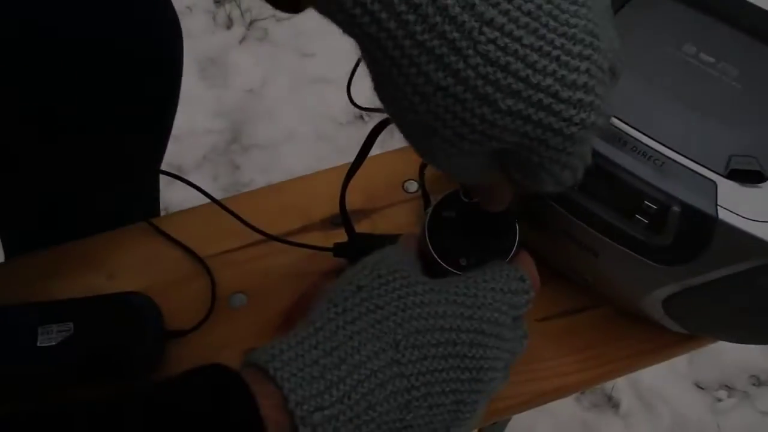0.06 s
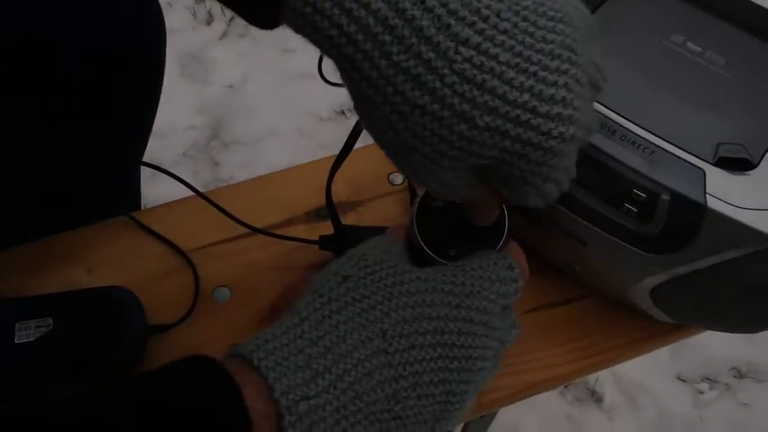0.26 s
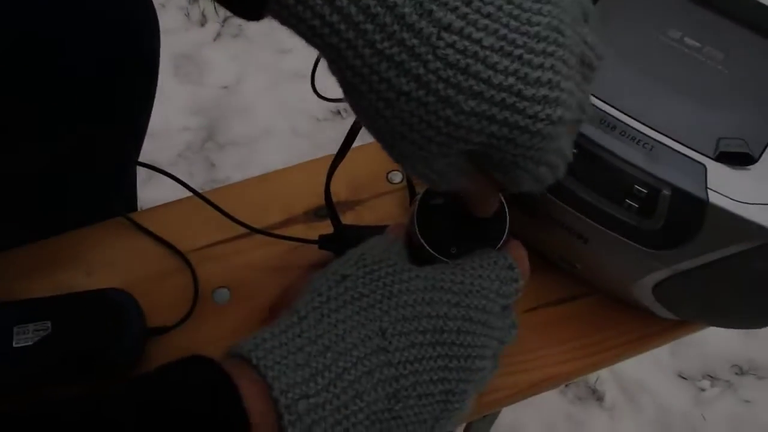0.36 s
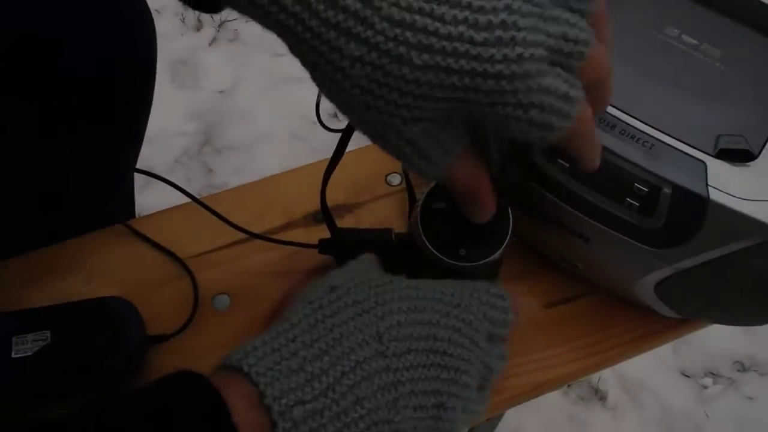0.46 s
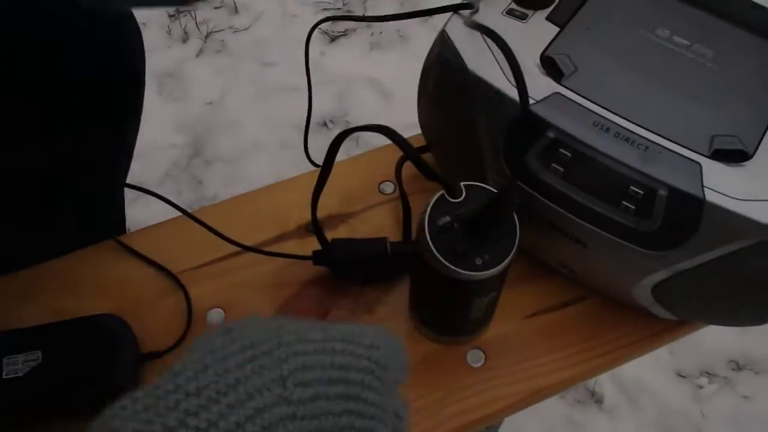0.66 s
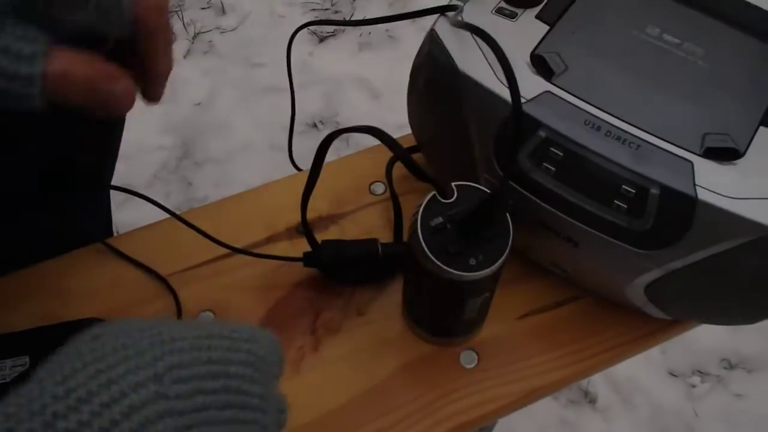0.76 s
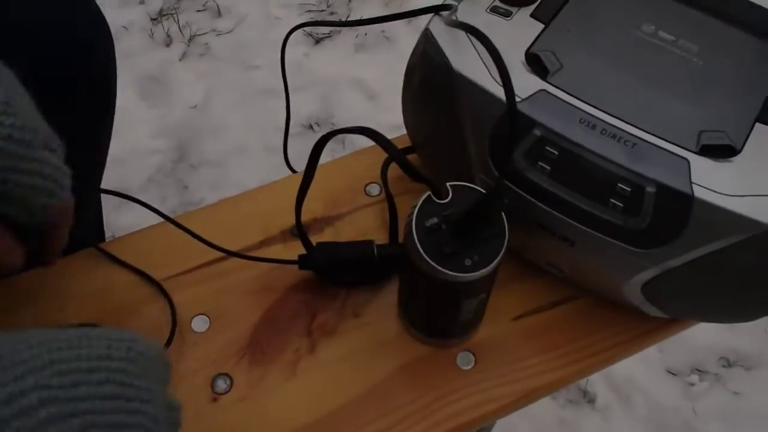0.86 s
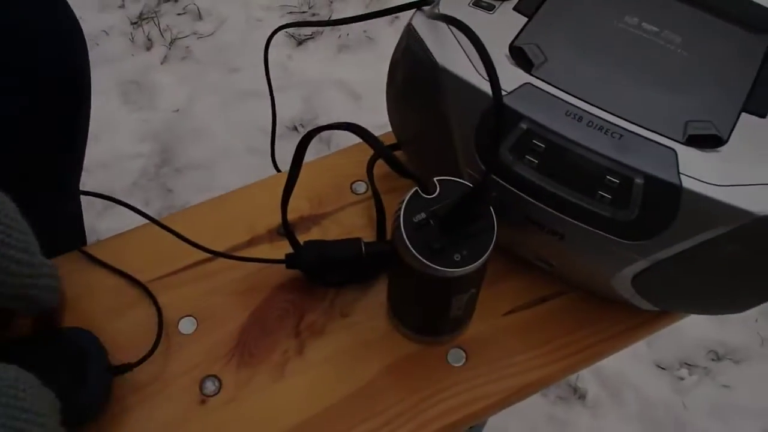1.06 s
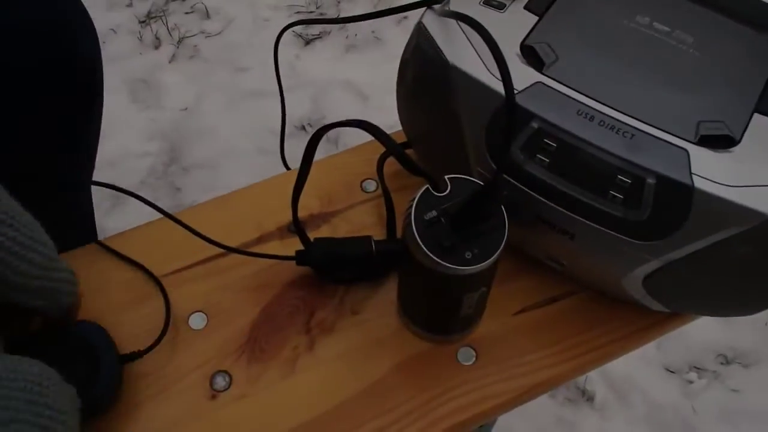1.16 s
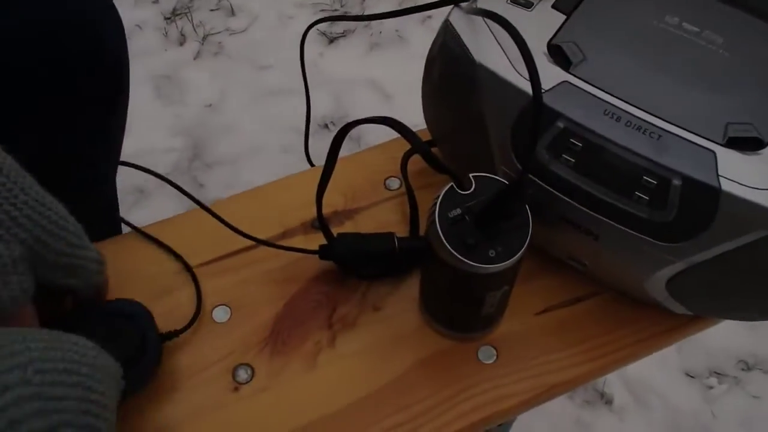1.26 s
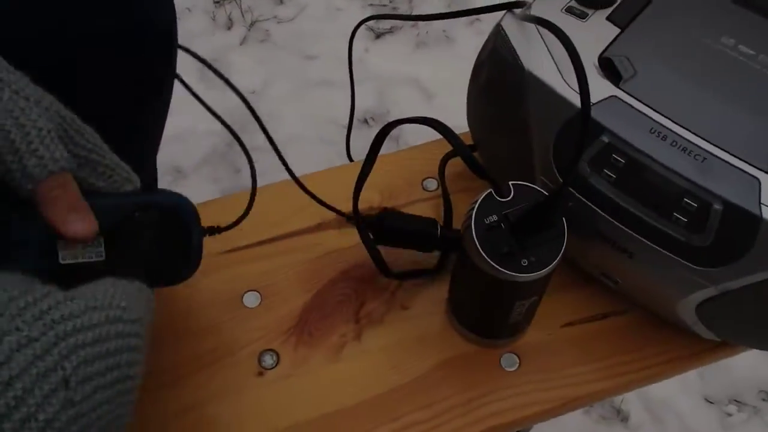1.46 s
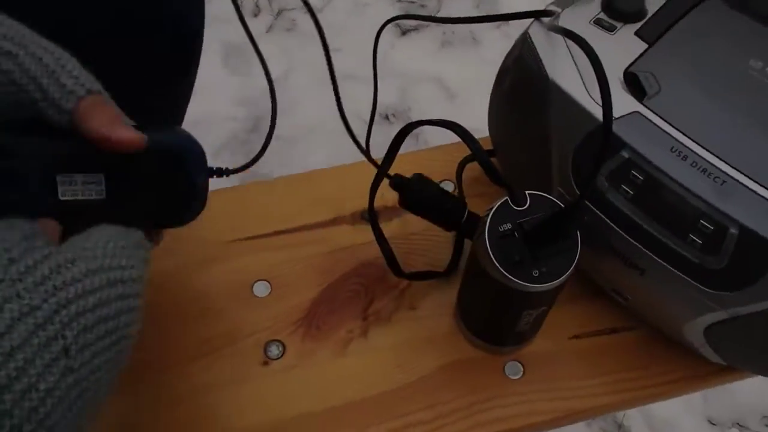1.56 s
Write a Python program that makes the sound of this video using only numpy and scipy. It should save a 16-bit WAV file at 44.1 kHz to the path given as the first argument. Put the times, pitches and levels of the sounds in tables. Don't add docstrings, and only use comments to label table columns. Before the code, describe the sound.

A plug clicks and snaps home, knocking a wooden plank, then lighter clicks of a lifted adaptor

```python
import sys
import numpy as np
from scipy import signal
from scipy.io import wavfile
from scipy.ndimage import uniform_filter1d

SR = 44100
rng = np.random.default_rng(int(sys.argv[2]) if len(sys.argv) > 2 else 0)


def volts_from_db(level):
    exponent = np.asarray(level, float) / 20
    return 10 ** exponent


def dump(signal):
    limited = np.clip(np.atleast_2d(signal).T, -1, 1)
    pcm = np.round(limited * 32767).astype(np.int16)
    wavfile.write(sys.argv[1], SR, pcm)


N = 70560
CAVITY_EDGE_HZ = 4080
CONTACT_CUT_HZ = 700


# (time [s], level [dB], brightness [dB], chatter length [ms], centre of the ring [Hz])
PLUG_CONTACTS = [(.0272, -14, -12, 2.3, 3500), (.0274, -15.5, -38, 2.1, 2445),
                 (.0274, -18.5, -30, 1.7, 1160), (.0895, -12.5, -41, 0.83, 1260),
                 (.0900, -8, -27.5, 2.8, 2490), (.0897, -27, -36, 1.1, 3330), (.096, -27, -22, 1.8, 1970),
                 (.1015, -13.5, -31, 2.5, 2500), (.101, -21, -40, 1.5, 3370), (.106, -21, -40, 3, 1600),
                 (.113, -21, -27, 1.7, 2410), (.117, -21, -40, 1.5, 1390), (.190, -19.5, -27, 2.3, 2500),
                 (.2283, -18.5, -4.5, 0.73, 3260), (.232, -21, -39, 3, 3000),
                 (.2380, -13.5, -18.5, 3.3, 3150), (.238, -9.5, -38, 5, 1970),
                 (.2476, -1.5, -14, 0.38, 3400), (.2478, -4.5, -41, 1, 2400), (.2485, -7, -48, 1.2, 1600),
                 (.251, -4, -30, 1, 2750), (.267, -21.5, -14.5, 13, 3230), (.287, -21, -24, 4, 2620),
                 (.2955, -12, -17, 3.9, 3000), (.3005, -8, -20.5, 1.1, 2510), (.3048, -1.5, -8, 1.18, 3500),
                 (.3067, 3, -7.5, 0.51, 3500), (.3070, -8.5, -30, 0.33, 1600), (.311, -4.5, -27, 1.7, 2870),
                 (.318, -24, -40, 7.9, 2660), (.626, -15, -26, 5.2, 1190), (.6405, -10, -40, 4.9, 1110),
                 (.6415, -13.5, -34, 2.7, 2350), (.646, -16.5, -36, 5.6, 1600)]
# (pitch [Hz], level [dB], time to fall 60 dB [s])
HOUSING_MODES = [(1150, -8, .010), (1600, -6, .014), (2050, -8, .013), (2445, -7, .013), (2930, -4, .010),
                 (3460, 1, .014), (3950, -9, .007)]


def plug_contacts():
    return contacts(PLUG_CONTACTS, HOUSING_MODES, lean=.5)


# (time [s], level [dB], brightness [dB], chatter length [ms], centre of the ring [Hz])
ADAPTOR_CONTACTS = [(.862, -24, -14.5, 8.9, 2560), (1.0468, -8, -20, 0.13, 2920),
                    (1.0537, -11.5, -3.5, 0.21, 3760), (1.081, -26.5, -7, 4.4, 3200),
                    (1.085, -18.5, -13, 1.1, 2360), (1.0881, -11.5, -5.5, 0.21, 3500),
                    (1.0882, -17.5, -46, 0.12, 1190), (1.0883, -15, -42, 0.24, 1800),
                    (1.3149, -23.5, -23, 0.6, 3500), (1.3435, -21, -24, 2, 3060),
                    (1.391, -14, -26, 2.6, 3300), (1.443, -19.5, -20, 1.4, 3360),
                    (1.451, -16.5, -15, 2.7, 3500), (1.452, -15, -26, 2.1, 2480),
                    (1.457, -19, -14, 5.3, 3500), (1.463, -30, -22, 3, 2730), (1.471, -31, -32, 4, 3200),
                    (1.4948, -15, -26, 2.9, 3130), (1.4950, -10, -28.5, 3.1, 2380)]
# (pitch [Hz], level [dB], time to fall 60 dB [s])
SHELL_MODES = [(1190, 2, 0.015), (1800, -12, 0.0045), (2540, -5.5, 0.012), (3150, -2.5, 0.0056),
               (3500, -1.5, 0.0075), (3870, -6.5, 0.0035)]


def adaptor_contacts():
    return contacts(ADAPTOR_CONTACTS, SHELL_MODES, lean=-.25)


# (pitch [Hz], level [dB], time to fall 60 dB [s])
THIN_WALL_MODES = [(5320, -4.5, 0.0028), (5820, -6, 0.0023), (6610, -1.5, 0.0022), (7550, -27, 0.0041),
                   (9640, -13.5, 0.0073), (10700, -23, 0.0034), (13700, -27, 0.0012)]


def contacts(rows, modes, lean):
    ticks_per_s, snap_db, bright_extra_db = 3600, -3.5, 9.5
    body = walls = 0
    for s, db, bright_db, ms, centre_hz in rows:
        body_ticks = chatter(ms, ticks_per_s)
        body_gains = around(modes, centre_hz, fall_db=69)
        body = strike(body, s, body_ticks, db + snap_db, modes, body_gains, ms)

        wall_ticks = chatter(ms * .7, ticks_per_s * .5)
        wall_db = db + snap_db + bright_db + bright_extra_db
        wall_gains = around(THIN_WALL_MODES, 6700, fall_db=2.5)
        walls = strike(walls, s, wall_ticks, wall_db, THIN_WALL_MODES, wall_gains)
    walls = high_pass(walls, 2, CAVITY_EDGE_HZ)
    body = high_pass(body, 2, CONTACT_CUT_HZ)
    return ports(under_edge(body) + walls, lean)


def spring():
    hz = 4888
    pair = [(hz, 0, .15), (hz + 55, -5, .14)]  # (pitch [Hz], level [dB], time to fall 60 dB [s])
    return ports(strike(0, .3105, np.ones(1), -31, pair, [0, 0]), lean=0.96)


# (time [s], level [dB], centre of the ring [Hz], push length [ms],
# share of the free ring time left under the hand [0..1])
KNOCKS = [(.029, -29.5, 555, 0.87, 0.33), (0.0893, -29.5, 975, 0.89, 0.45), (0.242, -26, 436, 0.83, 0.47),
          (.248, -19, 580, 1.3, 0.66), (.249, -16.5, 970, 2.9, 0.14), (0.263, -23, 560, 6, 0.46),
          (0.2992, -12.5, 600, 2, 1), (0.3034, -6, 611, 1.2, 0.95), (0.306, -13.5, 274, 2.3, 0.84),
          (0.303, -21.5, 345, 0.88, .5), (0.333, -11, 289, 1.3, 0.76), (0.335, -15.5, 670, 0.9, 0.69),
          (0.351, -16.5, 268, 0.79, 0.47), (0.384, -28.5, 427, 2.6, 1), (0.519, -34, 970, 10.4, 0.92),
          (.641, -24, 960, 1, 0.13), (0.641, -24, 238, 1.3, 0.44), (0.651, -22, 200, 6, 0.49),
          (0.66, -30, 200, 0.5, 0.84), (0.657, -29.5, 520, 0.62, 1), (0.679, -35, 218, 2.9, 0.51),
          (0.867, -31, 630, 0.72, 0.22), (1.0896, -20, 775, 0.095, 0.27), (1.092, -37, 745, 4, 0.44),
          (1.242, -37.5, 182, 3.5, 0.51), (1.32, -38.5, 263, 5.1, 1), (1.394, -33, 256, 3.4, 0.43),
          (1.429, -35, 208, 3.6, 0.64), (1.437, -18.5, 205, 1.6, 0.54), (1.441, -29, 500, 1.07, 0.86),
          (1.453, -37, 300, 4.1, 0.77), (1.468, -29, 277, 3, 0.57)]
# (pitch [Hz], level [dB], time to fall 60 dB [s])
PLANK_MODES = [(160, -18, 0.03), (205, 3.5, 0.11), (256, 0, 0.12), (345, 1, 0.12), (420, 5, 0.016),
               (514, -4.5, 0.14), (597.6, 2.5, 0.066), (745, -6.5, 0.13), (826, -3, 0.06),
               (975, -3.5, 0.17)]


def plank():
    knock_db, left_lead_s = -4, .000045
    out = 0
    for s, db, centre_hz, ms, share in KNOCKS:
        soft = np.hanning(int(.45 * SR / centre_hz) + 3)
        push = np.convolve(chatter(ms, 900), soft / soft.sum())
        damped = np.array(PLANK_MODES) * [1, 1, max(share, .1)]
        gains = around(PLANK_MODES, centre_hz, fall_db=52.5)
        out = strike(out, s, push, db + knock_db, damped, gains, ms)
    out = high_pass(out, 3, 212)
    n = np.arange(N)
    right = np.interp(n - left_lead_s * SR, n, out)
    return np.array([out, right])


def puff():
    start_s, level_db, length_ms = 1.0883, -17, 0.66
    t = np.maximum(np.arange(N) / SR - start_s, 0) / length_ms * 1000
    return volts_from_db(level_db) * t * (2 - t) * np.exp(-t)


# (time [s], level [dB])
DRIVE_TICKS = [(.0514, -22), (0.187, -26), (0.3196, -22), (0.4545, -25.5), (0.5873, -26.5), (.7206, -26.5),
               (0.8542, -28), (0.9876, -26), (1.1202, -27), (1.2546, -26), (1.3865, -24.5), (1.5200, -25)]
# (pitch [Hz], level [dB], time to fall 60 dB [s])
DRIVE_MODES = [(1700, 0, .005), (2500, -3, .005), (3400, -7, .004)]


def drive_ticks():
    rebound_s, rebound_db = 0.0013, -6
    push = np.zeros(int(rebound_s * SR) + 1)
    push[0], push[-1] = 1, volts_from_db(rebound_db)
    out = 0
    for s, db in DRIVE_TICKS:
        gains = rng.standard_normal(len(DRIVE_MODES))
        out = strike(out, s, push, db, DRIVE_MODES, gains)
    return ports(under_edge(high_pass(out, 2, CONTACT_CUT_HZ)), lean=0)


# (time [s], level [dB])
HANDLING = [(0, -46.5), (.1, -45), (.21, -47), (.25, -36.5), (.33, -35), (.38, -48), (.5, -50),
            (.62, -45.5), (.78, -45), (.86, -43), (1.0, -48.5), (1.06, -45.5), (1.2, -47), (1.36, -46),
            (1.46, -39.5), (1.53, -44), (1.6, -45.5)]
# (pitch [Hz], level per Hz [dB])
RUSTLE_TONE = [(80, -6), (250, 0.5), (900, -1.5), (1700, -1.5), (2500, 0.5), (3200, -4), (4200, 1)]


def rustle():
    grains_per_s, grain_share = 720, 0.14
    cavity_hz, cavity_db, cavity_t60_s = 3880, -8.5, 0.0033
    happens = rng.random(N) < grains_per_s / SR
    heights = rng.standard_normal(N) * volts_from_db(3.3 * rng.exponential(1, N).clip(0, 4))
    rubbing = grain_share * rms_one(happens * heights) + rng.standard_normal(N)
    source = coloured(rubbing, RUSTLE_TONE, patchy_db=1.56)
    heard = under_edge(source + volts_from_db(cavity_db) * ring(source, cavity_hz, cavity_t60_s))
    s, db = np.transpose(HANDLING)
    loudness = volts_from_db(np.interp(np.arange(N) / SR, s, db))
    return ports(loudness * rms_one(heard), lean=0.095)


# (pitch [Hz], level per Hz [dB])
AIR_TONE = [(30, -9), (70, 9), (130, -21.5), (250, 11.5), (600, 1.5), (1500, -4), (4000, -66)]


def outdoor_air():
    middle, side = rng.standard_normal((2, N))
    both = middle + 0.14 * side * np.array([[1], [-1]])
    return volts_from_db(-58.5) * coloured(both, AIR_TONE, patchy_db=3.0)


def hiss():
    return volts_from_db(-47) * high_pass(rng.standard_normal((2, N)), 1, 130)


def chatter(ms, per_s):
    t = np.arange(1500) / SR / max(ms, .05) * 1000
    chance, sign, height = rng.random((3, 1500))
    ticks = (chance < per_s / SR) * np.sign(sign - .5) * (0.5 + height)
    ticks[2] = 1
    ticks = ticks * (t + 0.64) * np.exp(-t ** 1.09)
    return ticks / np.sqrt(np.sum(ticks ** 2))


def around(modes, centre_hz, fall_db):
    octaves = np.log2(np.array(modes)[:, 0] / centre_hz)
    return -fall_db * octaves ** 2 + 2.0 * rng.standard_normal(len(modes))


def strike(out, s, push, db, modes, gains_db, ms=0.13):
    focus = 0.87
    i, add = int(s * SR), np.zeros(N + 12000)
    push = np.pad(push, (0, 9000))
    for (hz, mode_db, t60), gain_db in zip(modes, gains_db):
        build_up_s = min(t60, focus * ms / 1000 + 1 / hz)
        rung = ring(ring(push, hz, build_up_s), hz, t60)
        single = np.sqrt(t60 * SR / (4 * np.log(1000)))
        add[i:i + len(rung)] += volts_from_db(db + mode_db + gain_db) * single * rung / np.linalg.norm(rung)
    return out + add[:N]


def ring(x, hz, t60):
    r, w = volts_from_db(-60 / (t60 * SR)), 2 * np.pi * hz / SR
    return signal.lfilter([0, np.sin(w)], [1, -2 * r * np.cos(w), r * r], x + 1e-18)


def high_pass(x, order, hz):
    return signal.sosfilt(signal.butter(order, hz, "high", fs=SR, output="sos"), x)


def under_edge(x):
    low = signal.sosfilt(signal.cheby2(8, 35, CAVITY_EDGE_HZ * 1.08, fs=SR, output="sos"), x)
    return low + volts_from_db(-79) * high_pass(x, 4, CAVITY_EDGE_HZ * 1.2)


def ports(x, lean):
    port_hz, port_db, port_lag_s, lean_hz = 1510, -6.5, .00005, 4530
    n = np.arange(N)
    high = high_pass(x, 2, port_hz)
    turned = high - np.interp(n - port_lag_s * SR, n, high)
    shaded = x - signal.sosfiltfilt(signal.butter(2, lean_hz, fs=SR, output="sos"), x)
    side = lean * shaded + volts_from_db(port_db) * turned
    return np.array([x + side, x - side])


def coloured(x, spectrum, patchy_db):
    hz, db = np.transpose(spectrum)
    edges = 25 * 2 ** (np.arange(29) / 3)
    out = 0
    for low, high in zip(edges, edges[1:]):
        band = signal.sosfilt(signal.butter(2, [low, high], "band", fs=SR, output="sos"), x)
        band_db = np.interp(np.log(low * high) / 2, np.log(hz), db)
        out = out + band * volts_from_db(band_db + patchy_db * drift(18.7))
    return rms_one(out)


def drift(rate):
    r = np.exp(-80 * np.pi * rate / SR)
    slow = signal.lfilter([1], [1, -2 * r, r * r], rng.standard_normal(N // 40 + 2002))[2000:]
    return np.interp(np.arange(N) / 40, np.arange(len(slow)), rms_one(slow))


def rms_one(x):
    return x / np.sqrt(np.mean(x ** 2) + 1e-20)


def scene():
    background = outdoor_air() + hiss()
    clicks = plug_contacts() + adaptor_contacts()
    ticks = drive_ticks()
    bench = (plank() + puff()) * volts_from_db(np.array([[.3], [-.3]]))
    return clicks + ticks + bench + spring() + rustle() + background


def low_pass(x):
    return signal.sosfilt(signal.butter(12, 16410, fs=SR, output="sos"), x)


def record(dry):
    duck_from_db, duck_share, recover_db_per_s, attack_s = -19, .55, 9, .015
    clip_top = 1.1
    t = np.arange(N) / SR
    level = 10 * np.log10(uniform_filter1d(np.mean(dry ** 2, axis=0), size=441) + 1e-12)
    over = duck_share * np.maximum(level - duck_from_db, 0)
    duck = np.maximum.accumulate(over + recover_db_per_s * t) - recover_db_per_s * t
    r = np.exp(-1 / (attack_s * SR))
    x = dry * volts_from_db(-signal.lfilter([1 - r], [1, -r], duck))
    x = clip_top * np.tanh(x / clip_top)
    x = signal.sosfilt(signal.cheby2(12, 60, 16450, fs=SR, output="sos"), x)
    mix = high_pass(x, 2, 43)
    return low_pass(mix)


dry = scene()
out = record(dry)
dump(out)
```